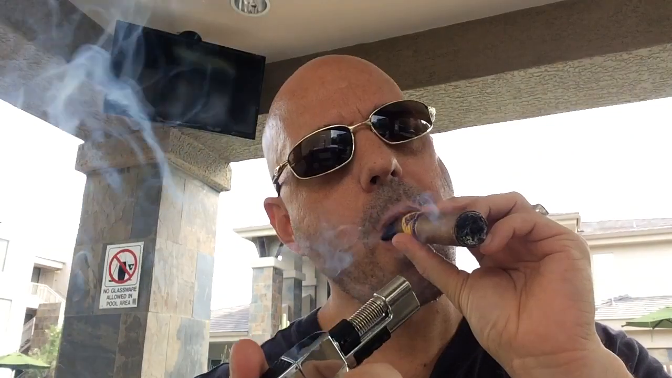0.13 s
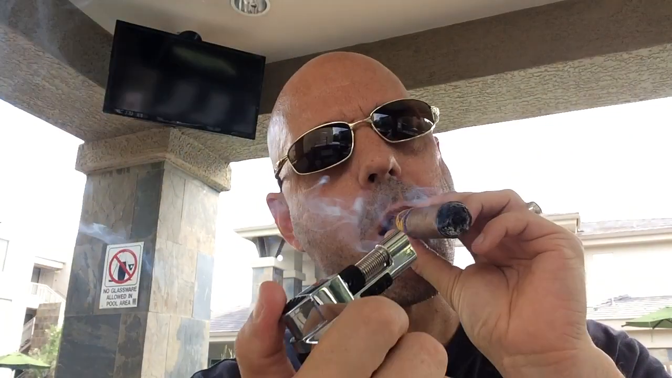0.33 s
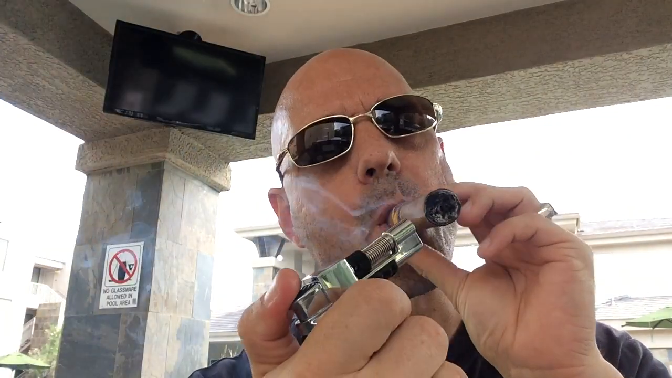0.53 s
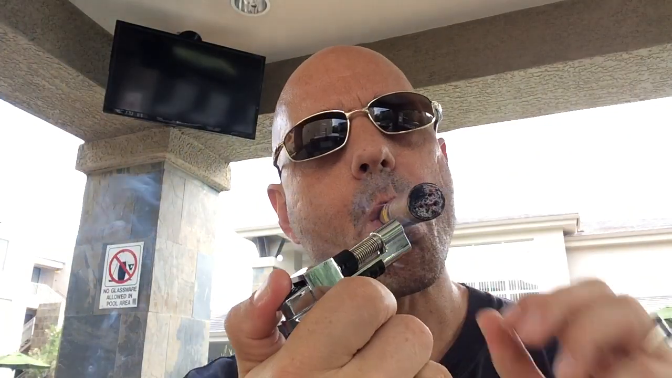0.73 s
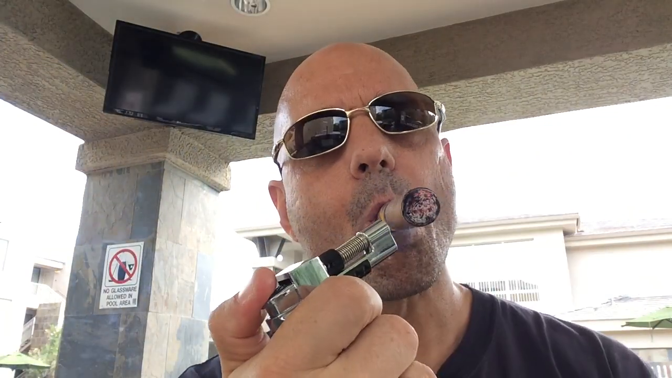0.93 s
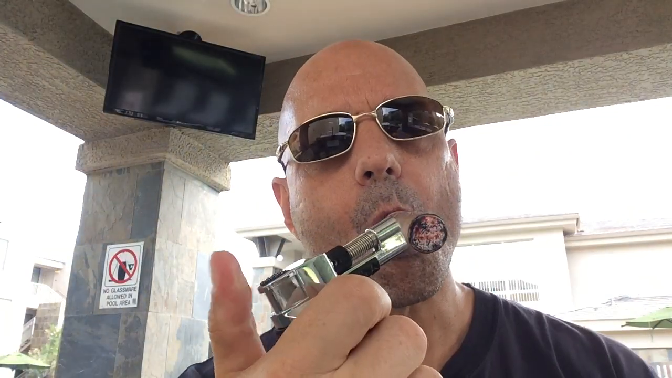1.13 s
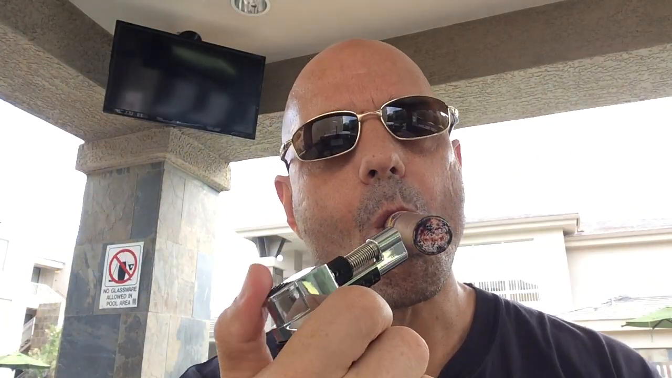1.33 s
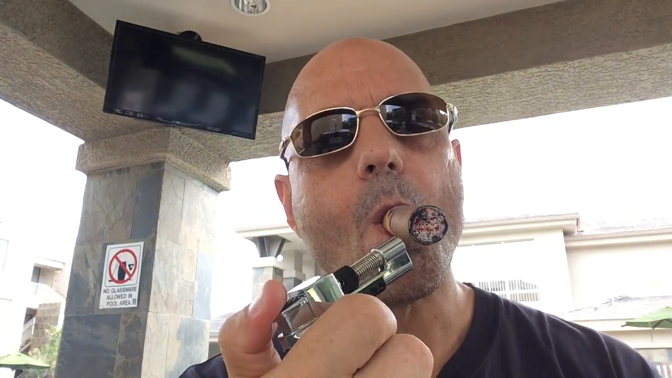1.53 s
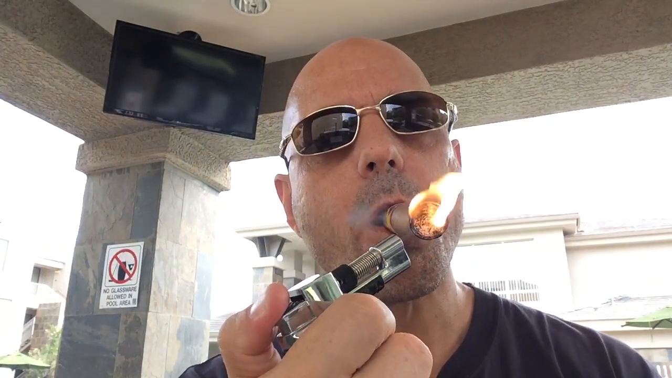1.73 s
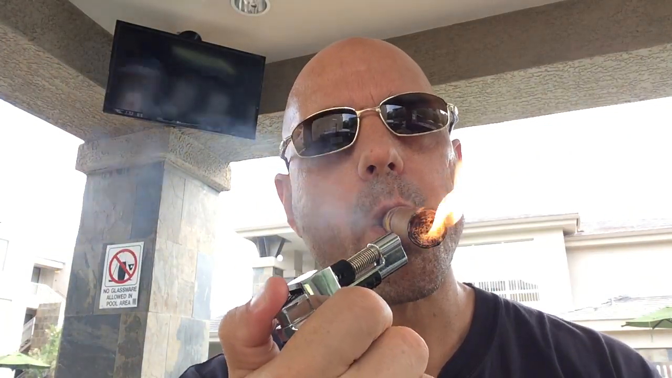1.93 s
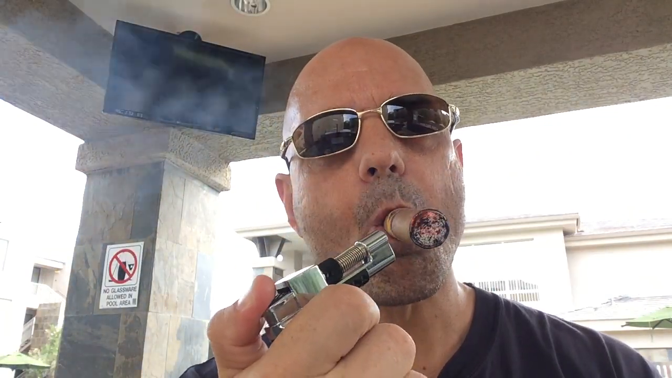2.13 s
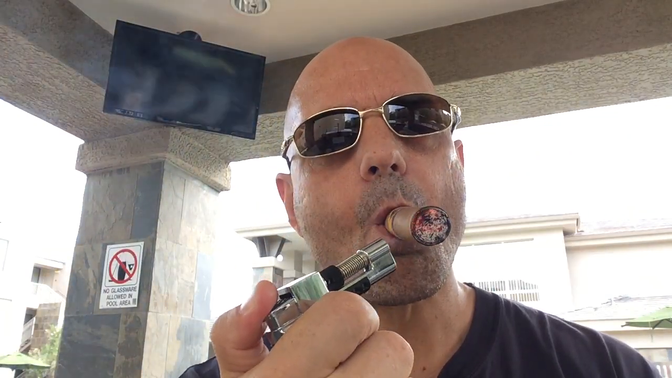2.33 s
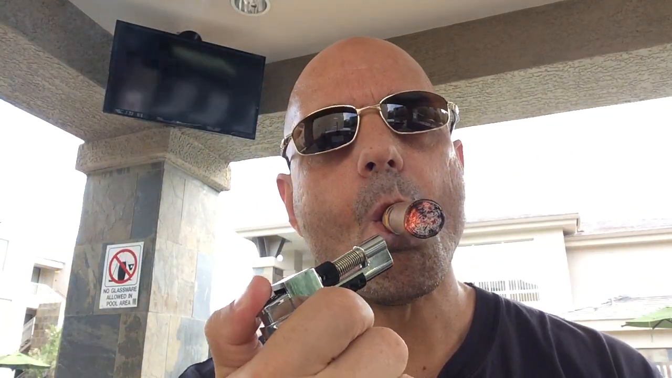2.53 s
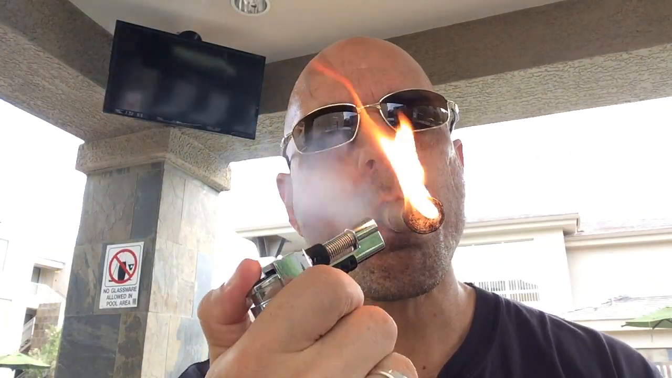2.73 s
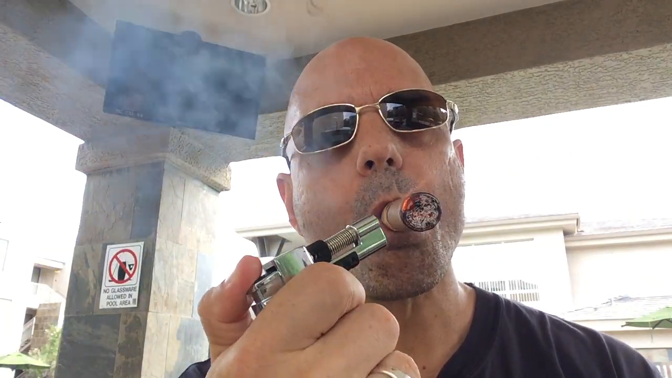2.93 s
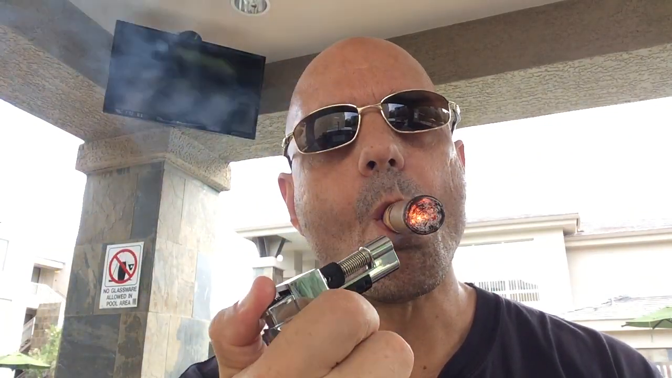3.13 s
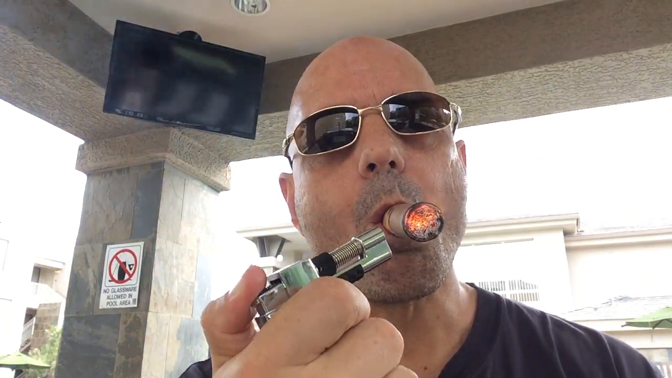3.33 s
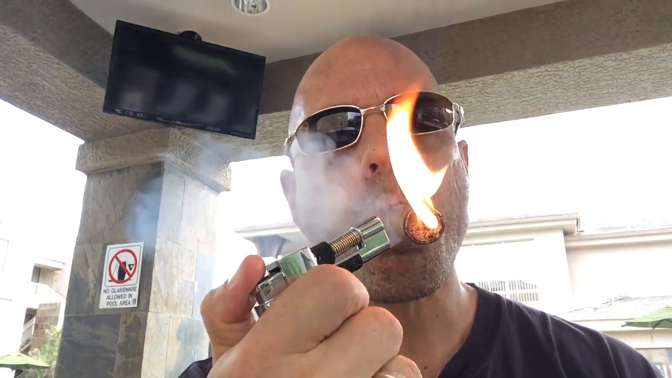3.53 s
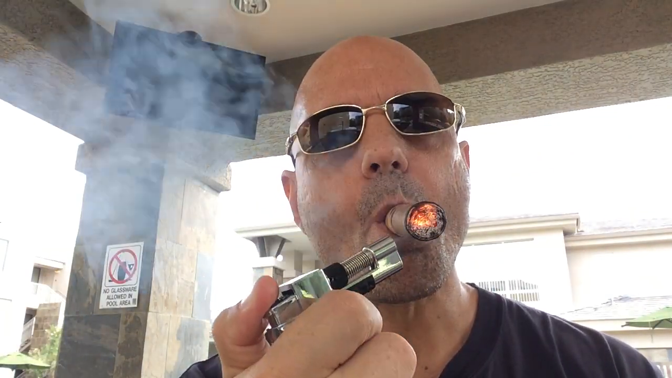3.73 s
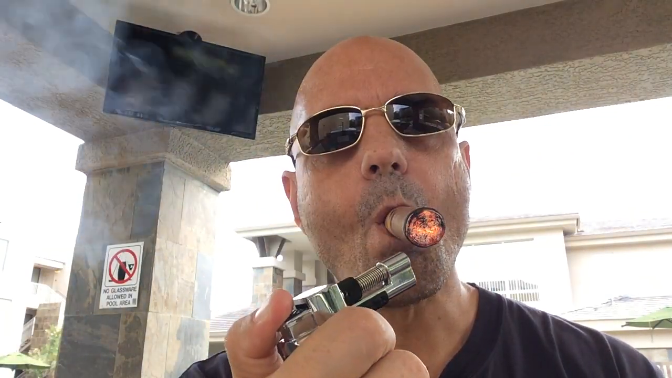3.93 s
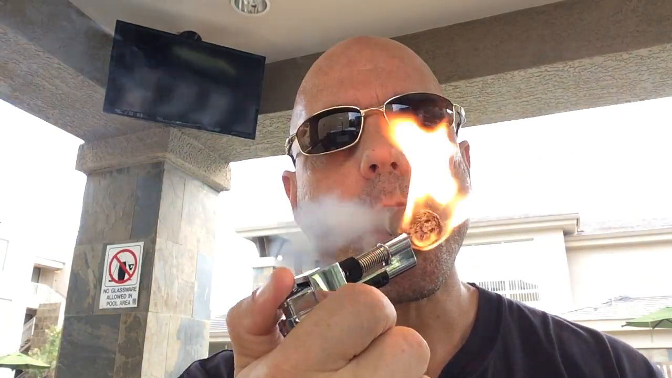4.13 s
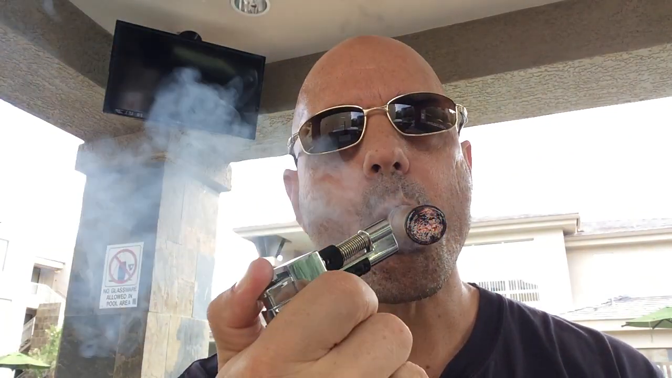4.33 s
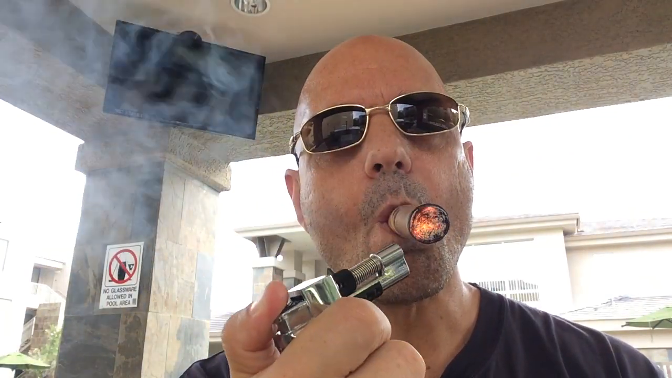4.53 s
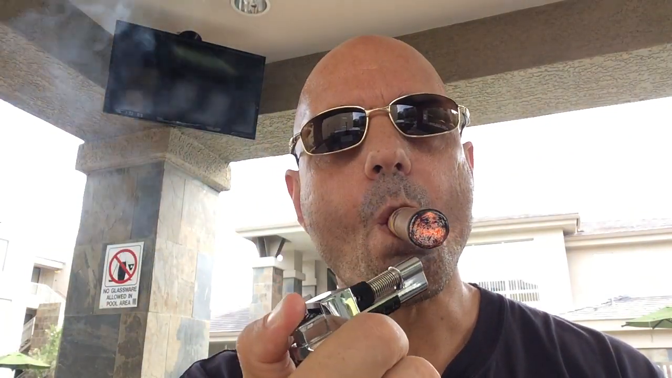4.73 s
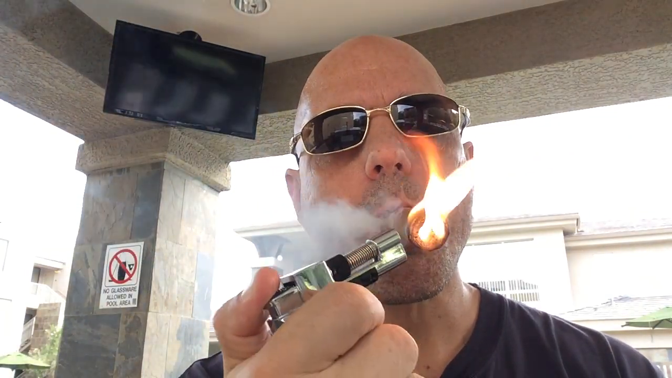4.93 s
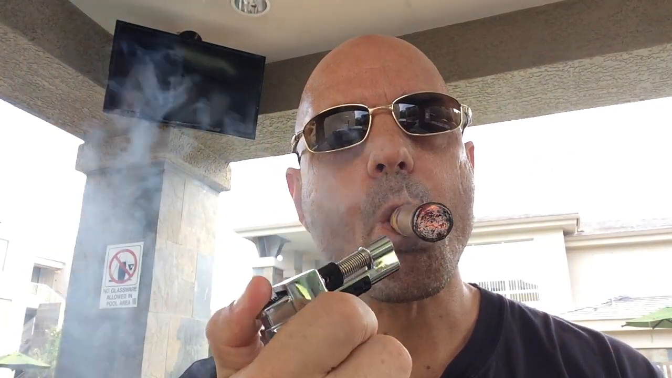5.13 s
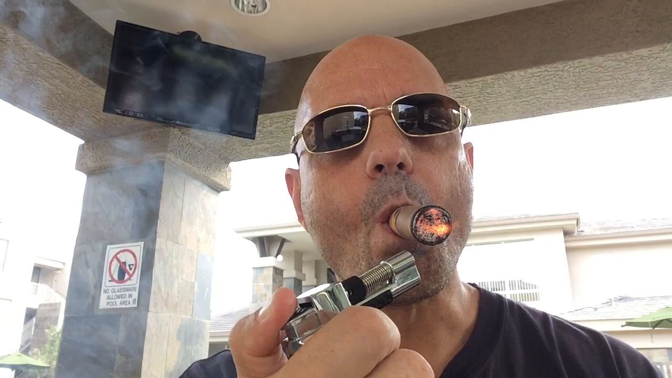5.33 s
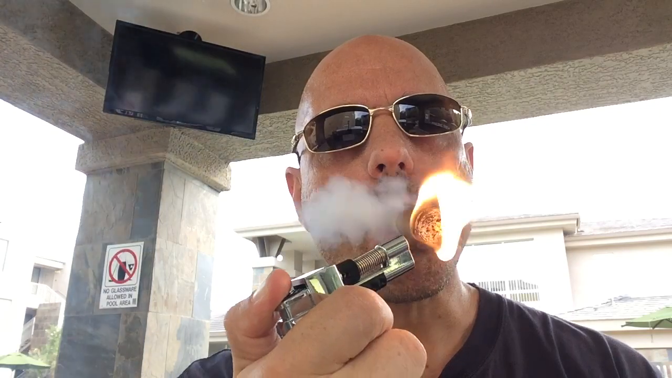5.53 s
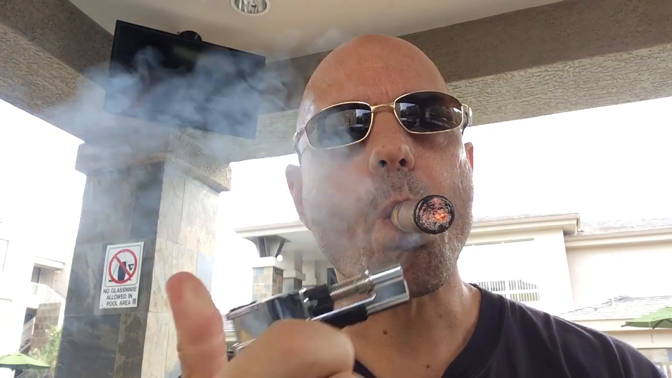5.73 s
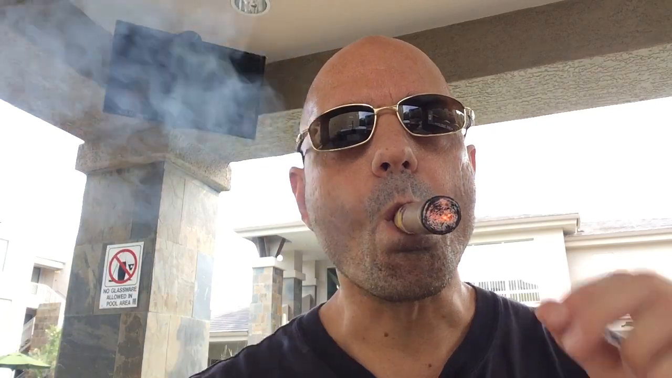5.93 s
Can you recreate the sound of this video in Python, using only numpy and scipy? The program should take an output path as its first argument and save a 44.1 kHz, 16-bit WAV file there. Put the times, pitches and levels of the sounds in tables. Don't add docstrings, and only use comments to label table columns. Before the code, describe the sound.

A torch lighter cracks and releases, cracks again and burns with a steady faint hissing jet on a quiet patio, then clicks off.

```python
import sys
import numpy as np
from scipy import signal
from scipy.fft import rfft, irfft, next_fast_len
from scipy.io import wavfile
from scipy.ndimage import uniform_filter1d, minimum_filter1d, map_coordinates

SR = 44100
rng = np.random.default_rng(int(sys.argv[2]) if len(sys.argv) > 2 else 0)


def makeup_ratio(level_db):
    decades = np.asarray(level_db, float) / 20
    return 10 ** decades


def wav_out(sig):
    wavfile.write(sys.argv[1], SR, np.round(np.clip(np.atleast_2d(sig).T, -1, 1) * 32767).astype(np.int16))


N = 268524


def unit(x):
    return x / np.sqrt(np.mean(x ** 2) + 1e-20)


def along(points, hz):
    f, v = np.transpose(points)
    return np.interp(np.log(hz + 1), np.log(f + 1), v)


def shaped(spectrum):
    return lambda hz: makeup_ratio(along(spectrum, hz))


def curves(rows):
    s, *cols = np.transpose(rows)
    return [np.interp(np.arange(N) / SR, s, c) for c in cols]


def wobble(rate):
    knots = rng.standard_normal(int(N * rate / SR) + 4)
    return map_coordinates(knots, [np.arange(N) * rate / SR])


def ramp(s, length, from_db):
    return from_db * (1 - np.clip((np.arange(N) / SR - s) / length, 0, 1))


def fall(s, length):
    return -40 - ramp(s, length, -40)


def fade(s, length, edge_s):
    t = np.arange(N) / SR
    return np.clip(np.minimum(t - s, s + length - t) / edge_s + .5, 0, 1)


def tone(hz):
    return np.sin(2 * np.pi * np.cumsum(hz) / SR)


def filtered(x, response):
    m = next_fast_len(len(x) + SR // 2)
    return irfft(rfft(x, m) * response(np.fft.rfftfreq(m, 1 / SR)), m)[:len(x)]


def rush(response, patchy_db):
    z = signal.stft(rng.standard_normal(N), nperseg=512)[2]
    field = uniform_filter1d(rng.standard_normal(z.shape), size=6, axis=0)
    field = uniform_filter1d(field, size=14, axis=1)
    patchy = signal.istft(z * makeup_ratio(patchy_db * unit(field)), nperseg=512)[1][:N]
    return unit(filtered(patchy, response))


# (pitch [Hz], level per Hz [dB])
AIR = [(1, -19), (3, 13.5), (10, -4.5), (20, -9), (35, -3.5), (48, -18), (90, -64.5)]


def moving_air():
    gust_db = -0.5 * wobble(2.7)
    return makeup_ratio(-57 + 12.5 + gust_db) * rush(shaped(AIR), patchy_db=-2.0)


# (pitch [Hz], level per Hz [dB])
ENGINES = [(35, -30.5), (60, 0.5), (75, 2), (95, -7), (120, -7), (160, -11.5), (300, -54.5)]
# (time [s], level [dB])
TRAFFIC = [(0.0, -43.5), (0.05, -53), (1.29, -55.5), (1.56, -50.5), (3.0, -56), (3.03, -52.5), (3.48, -54),
           (4.22, -52), (5.94, -57), (6.09, -56)]


def far_engines():
    engines_db, = curves(TRAFFIC)
    return makeup_ratio(engines_db - 1.0) * rush(shaped(ENGINES), patchy_db=-0.76)


# (start [s], length [s], pitch [Hz], level [dB])
NOTES = [
    (0, 6.8, 120, -65.5),
    (1.15, 2.25, 64, -58.5),
    (1.452, 1.2, 77, -57.5),
    (3.4, 1.63, 87, -60.5),
    (3.6, 1.23, 72, -56),
    (4.6, 0.95, 110, -60.5),
]


def engine_notes():
    out = np.zeros(N)
    for s, length, hz, db in NOTES:
        level = makeup_ratio(db + 3.5 + 3.3 * wobble(4)) * fade(s, length, edge_s=0.36)
        out += level * tone(hz + 1.8 * wobble(3))
    return out


# (pitch [Hz], level per Hz [dB])
TYRES = [(100, -31), (200, 0), (350, -2.5), (600, -7.5), (1000, -14), (2000, -22), (4000, -29.5),
         (8000, -35.5), (16000, -41.5)]


def far_tyres():
    rise_db = 0.39 * np.arange(N) / SR
    return makeup_ratio(-57.5 + rise_db) * rush(shaped(TYRES), patchy_db=1.65)


# (start [s], length [s], pitch [Hz], level [dB])
DRONE = [
    (.36, .16, 255, -63),
    (.52, .41, 260, -69),
    (.935, .345, 260, -58.5),
    (1.28, .3, 252, -69),
]


def distant_drone():
    swells = sum(makeup_ratio(db) * fade(s, length, edge_s=.03) for s, length, _, db in DRONE)
    middles = [s + length / 2 for s, length, _, _ in DRONE]
    hz = np.interp(np.arange(N) / SR, middles, [row[2] for row in DRONE])
    hz = hz + 1.5 * wobble(8.74)
    return swells * makeup_ratio(5.5 + 1.4 * wobble(16)) * tone(hz)


# (pitch [Hz], level [dB])
FAN = [(592, -70.5)]


def fan_hum():
    return sum(makeup_ratio(db + 2.5 + 2.1 * wobble(6.6)) * tone(hz + 3 * wobble(8)) for hz, db in FAN)


def street():
    return moving_air() + far_engines() + far_tyres() + distant_drone() + fan_hum() + engine_notes()


def resonances(modes):
    def response(f):
        out = 0
        for k, (c, w, db) in enumerate(modes):
            out = out + (-1) ** k * makeup_ratio(db) * 1j * f * w / (c * c - f * f + 1j * f * w)
        return out
    return response


def evened(x, size):
    spectrum = rfft(x)
    power = uniform_filter1d(np.abs(spectrum) ** 2, size=size)
    cepstrum = irfft(-.5 * np.log(power + 1e-12), len(x))
    cepstrum[1:len(x) // 2] *= 2
    cepstrum[len(x) // 2 + 1:] = 0
    return irfft(spectrum * np.exp(rfft(cepstrum)), len(x))


def snap(body, t60, chatter_db):
    t = np.arange(SR // 3) / SR
    contacts = makeup_ratio(chatter_db - 60 * t / t60) * rng.standard_normal(len(t))
    contacts[0] = 1
    small_source = lambda f: (1j * f / (700 + 1j * f)) ** 2
    hit = filtered(evened(contacts, size=90), lambda f: resonances(body)(f) * small_source(f))
    return hit / np.abs(hit).max()


# (delay [s], level [dB])
WALLS = [
    (.0036, -34),
    (0.0144, -20),
]
# (pitch [Hz], time to fall 60 dB [s])
PATIO = [(800, .16), (3000, 0.21), (7000, 0.2), (15000, 0.18)]


def in_patio(hit, body, wet_db, echo_db):
    t = np.arange(len(hit)) / SR
    hz, frames, z = signal.stft(rng.standard_normal(len(hit)), SR, nperseg=256)
    decay = makeup_ratio(-60 * frames / along(PATIO, hz)[:, None])
    tail = signal.istft(z * decay, SR, nperseg=256)[1][:len(hit)]

    def blurred(f):
        power = sum(makeup_ratio(2 * db) / (1 + ((f - c) / (0.76 * w)) ** 2) for c, w, db in body)
        return np.sqrt(power) * (f > 900)

    tail = filtered(tail, blurred) * (1 - np.exp(-t / .003))
    tail = tail * np.linalg.norm(hit) / np.linalg.norm(tail)
    echoes = sum(makeup_ratio(db) * np.roll(hit, round(s * SR)) for s, db in WALLS)
    echoes = filtered(echoes, lambda f: 1 / (1 + 1j * f / 9000))
    return hit + makeup_ratio(echo_db) * echoes + makeup_ratio(wet_db) * tail


def placed(hits):
    out = np.zeros(N + SR)
    for s, hit in hits:
        out[round(s * SR):][:len(hit)] += hit
    return out[:N]


# (time [s], peak [dB], pitch [Hz], life [cycles])
TICKS = [(.116, -57, 8700, 6), (.1346, -54, 4200, 2), (.478, -52.5, 6200, 6.2), (1.171, -55, 8000, 1),
         (1.1942, -50, 10000, 1.52), (1.3715, -65, 9000, 1.7), (1.4155, -56, 9000, 2),
         (1.456, -58, 5500, 3), (1.4605, -56, 6500, 4), (1.6485, -48.5, 11000, 1.5),
         (3.055, -45, 5000, 0.92), (5.716, -54, 5500, 2), (5.7513, -50, 11000, 1.5)]


def rattles():
    return placed([(s, makeup_ratio(db) * snap([(hz, hz / cycles, 0)], 0.0086, chatter_db=-10))
                   for s, db, hz, cycles in TICKS])


# (time [s], peak [dB], jolt [dB], brightness [dB])
PRESS = [
    (.699, -2, -32.5, -4),
    (1.6492, -1, -29.5, 3),
]
# (pitch [Hz], width [Hz], level [dB])
PRESS_BODY = [(1805, 430, -5), (2630, 210, -43.5), (3340, 434, 3.5), (4600, 600, -1.5), (6480, 550, 2),
              (9050, 500, 0), (10600, 830, -1), (12040, 430, 1.5), (13130, 570, 1), (14200, 300, -12.5),
              (694, 130, -11.5), (16060, 500, -11)]


def presses():
    t = np.arange(SR // 3) / SR
    jolt = np.sin(2 * np.pi * 105 * t) * makeup_ratio(-60 * t / 0.041)
    hits = []
    for s, db, jolt_db, bright_db in PRESS:
        body = [(hz, w, level + bright_db * (9500 < hz < 12000)) for hz, w, level in PRESS_BODY]
        crack = in_patio(snap(body, 0.007, chatter_db=-12.5), body, wet_db=-20.5, echo_db=0.5)
        hits.append((s, makeup_ratio(db) * (crack + makeup_ratio(jolt_db) * jolt)))
    return placed(hits)


# (time [s], peak [dB], time to fall 60 dB [s], low knock [dB], cap ring [dB])
RELEASE = [
    (1.1967, -9.5, 0.011, -2.5, -54),
    (1.3737, -26.5, 0.0071, -10.5, -48),
    (1.383, -37, 0.011, 1, -52),
    (1.405, -42, 0.006, 0, -57),
    (5.7534, -9, 0.01, -1, -51),
]
# (pitch [Hz], width [Hz], level [dB])
RELEASE_BODY = [(1380, 560, -7), (3250, 420, -7), (5880, 580, -1.5), (7650, 210, -19.5), (7450, 210, -7),
                (11000, 360, 1), (12050, 400, -8), (14200, 320, -18.5), (14900, 510, -23),
                (640, 160, -13.5)]
# (pitch [Hz], width [Hz], level [dB])
CLOSE_BODY = [(1580, 380, -3), (2960, 180, -14.5), (4200, 120, -27), (5970, 620, 1), (8190, 130, -0.5),
              (11000, 850, 1), (12700, 140, -17), (13420, 440, -18.5), (14900, 240, -23)]
# (pitch [Hz], level [dB], time to fall 60 dB [s])
CAP = [(5940, -30, .12), (8600, 4, 0.24), (11080, -21.5, .12)]


def releases():
    t = np.arange(SR // 3) / SR
    ring = sum(makeup_ratio(level - 60 * t / decay) * np.sin(2 * np.pi * hz * t) for hz, level, decay in CAP)
    hits = []
    for s, db, t60, knock_db, cap_db in RELEASE:
        held = CLOSE_BODY if s == RELEASE[-1][0] else RELEASE_BODY
        body = [(hz, w, level + knock_db * (hz < 5000)) for hz, w, level in held]
        clack = in_patio(snap(body, t60, chatter_db=-11.0), body, wet_db=-22.5, echo_db=-3)
        hits.append((s, makeup_ratio(db) * (clack + makeup_ratio(cap_db) * ring)))
    return placed(hits)


# (swell time [s], swell fall [s], swell level [dB], collapse time [s], collapse level [dB])
FLARES = [
    (1.865, 0.125, -16.7, 2.115, -17.5),
    (2.791, 0.047, -5.9, 2.986, -11.7),
    (3.507, 0.055, -11.3, 3.694, -16.3),
    (4.244, 0.138, -14.2, 4.393, -13.1),
    (4.98, 0.053, -9.2, 5.152, -15.4),
    (5.614, 0.059, -9.8, 5.79, -15.4),
]


def flares():
    t = np.arange(N) / SR

    def bump(s, rise_s, fall_s, sharp):
        return np.exp(-np.abs((t - s) / np.where(t < s, rise_s, fall_s)) ** sharp)

    push = np.zeros(N)
    for s, fall_s, db, end, end_db in FLARES:
        push -= makeup_ratio(db) * bump(s, .037, fall_s, 1.97)
        push += makeup_ratio(end_db) * bump(end, .047, .108, 1.62)
    return filtered(push, lambda hz: 1j * hz / (1.47 + 1j * hz))


def flat_peak(hz, centre, width, db):
    return makeup_ratio(db) / (1 + (2 * (hz - centre) / width) ** 4) ** .5


# (pitch [Hz], level per Hz [dB])
HISS = [(1200, -36.5), (2400, -11), (4000, -8), (7500, -11), (9000, -8), (11500, -5.5), (13700, -10.5),
        (14100, -27.5), (14500, -22.5), (15300, -11.5)]
# (pitch [Hz], width [Hz], level on the hiss scale [dB])
VALVE_SEAT = (4600, 230, -4.5)


def hiss():
    return rush(lambda hz: shaped(HISS)(hz) + flat_peak(hz, *VALVE_SEAT), patchy_db=1.5)


# (time [s], pitch [Hz], level against the whistle [dB])
OVERTONE = [(1, 9140, 0), (1.8, 9175, -10), (2.5, 9040, -4.5), (3.6, 9050, -4.5), (4, 9050, -14),
            (4.5, 9050, -2.5), (4.8, 9000, -16), (4.95, 8700, -5), (5.25, 9050, -11)]


def overtone(width_hz):
    hz, db = curves(OVERTONE)
    turn = 2 * np.pi * np.cumsum(hz) / SR
    narrow = lambda f: 1 / (1 + (2 * f / width_hz) ** 4)
    slow = [rush(narrow, patchy_db=-1.5) for _ in range(2)]
    return makeup_ratio(db) * (slow[0] * np.cos(turn) + slow[1] * np.sin(turn))


# (pitch [Hz], width [Hz], level [dB])
NOZZLE = [(4596, 210, -11), (8660, 550, -14), (10730, 880, -0.5), (12000, 310, -11.5), (12900, 190, -11),
          (13670, 190, -9.5)]


def whistle():
    tube = lambda hz: sum(flat_peak(hz, *mode) for mode in NOZZLE)
    return rush(tube, patchy_db=2.0) + overtone(width_hz=430)


# (pitch [Hz], level per Hz [dB])
ROAR = [(300, -19.5), (700, 0.5), (1100, -3.5), (1350, 1.5), (1800, -3.5), (2150, -6.5), (2500, -32),
        (4000, -37)]


def roar():
    return rush(shaped(ROAR), patchy_db=1.0)


# (opens [s], spark [s], shuts [s], flow [dB])
VALVE = [
    (0.496, 0.693, 1.19, -2),
    (1.46, 1.649, 5.75, 0),
]


def valve():
    gas = sings = burns = 0
    warm_s, catch_s = 0.099, 0.042
    for opens, spark, shuts, db in VALVE:
        flow_db = db + ramp(opens, .058, -35) + fall(shuts, .12)
        gas = gas + makeup_ratio(flow_db + ramp(spark, warm_s, -3.5))
        sings = sings + makeup_ratio(2.2 * db + flow_db + ramp(spark, warm_s, -8.5))
        flame_db = 1.9 * db + ramp(spark - catch_s, catch_s, -44.5)
        burns = burns + makeup_ratio(flame_db + fall(shuts + .03, 0.11))
    return gas, sings, burns


# (time [s], closeness [dB], turn from hiss toward whistle [dB])
HAND = [(1.8, -2.5, -2), (2.2, 0.5, 0), (2.83, -0.5, 0), (3.1, -1, -1.5), (3.73, 0.5, 0), (4, 2, -.5),
        (4.4, -1, -0.5), (4.85, 2, 1), (5.3, 1.5, 0), (5.73, 1.5, 2)]


def jet():
    near_db, turn_db = curves(HAND)
    gas, sings, burns = valve()
    flutter_db = 1.3 * wobble(3.01) + .5 * wobble(19)
    out = gas * makeup_ratio(-67.5 + near_db - turn_db + flutter_db) * hiss()
    out += sings * makeup_ratio(-69 + near_db + turn_db + flutter_db) * whistle()
    out += burns * makeup_ratio(-62.5 + 0.29 * near_db + flutter_db) * roar()
    return out


def scene():
    return (street() + rattles() + presses() + releases() + flares() + jet())[None]


def masked(x, under_db):
    hz, _, z = signal.stft(x, SR, nperseg=1024)
    power = uniform_filter1d(np.abs(z) ** 2, size=5, axis=0)
    power = uniform_filter1d(power, size=2, axis=1)
    loud = power[(hz > 10000) & (hz < 11500)].mean(axis=0)
    calm = minimum_filter1d(1. * (loud < 8 * np.median(loud)), size=5)
    lost = (power < makeup_ratio(-4 * under_db) * loud * calm) & (hz[:, None] > 9000)
    return signal.istft(z * ~lost, SR, nperseg=1024)[1][:N]


def roll_off(x):
    return signal.sosfilt(signal.butter(12, 16570, fs=SR, output="sos"), x)


def record(dry):
    edge = signal.ellip(9, .2, 27, 15280, fs=SR, output="sos")
    mix = signal.sosfilt(edge, masked(dry[0], under_db=7.5))[None]
    return roll_off(mix)


dry = scene()
out = record(dry)
wav_out(out)
```